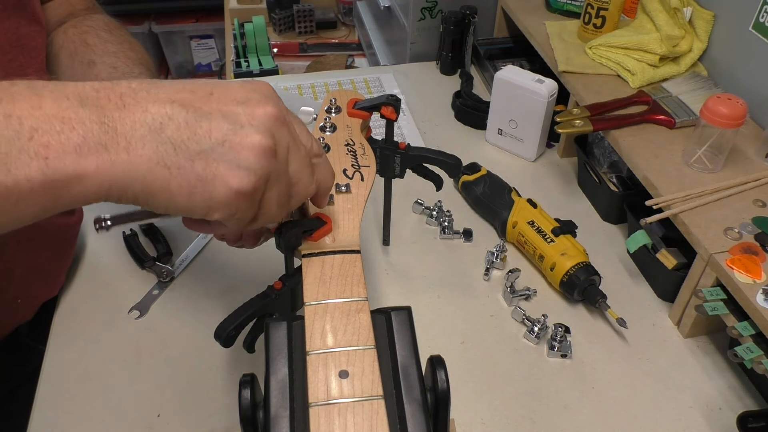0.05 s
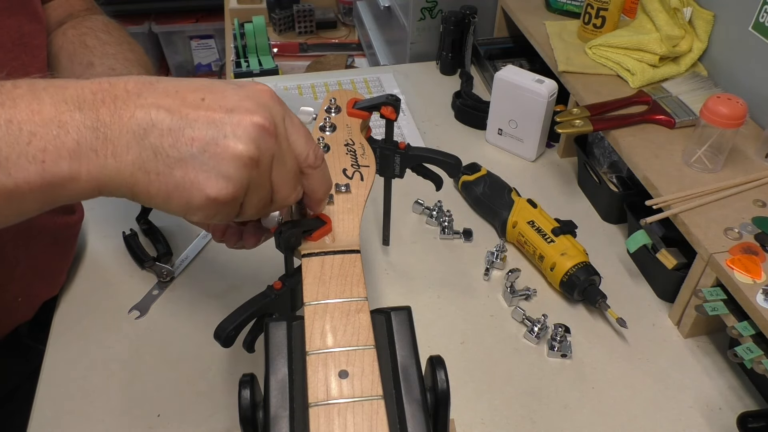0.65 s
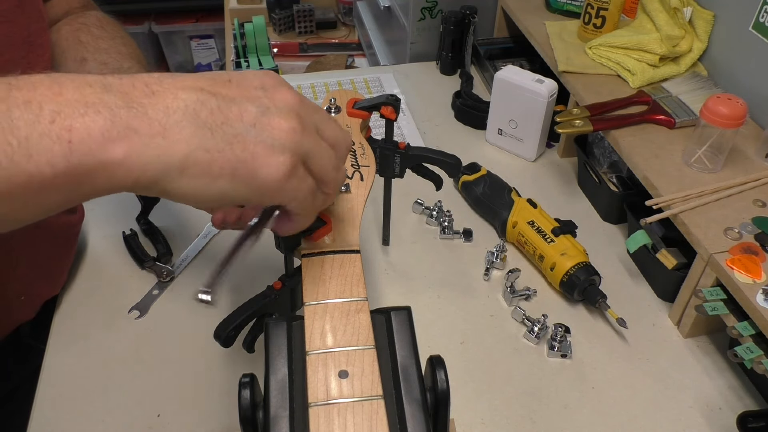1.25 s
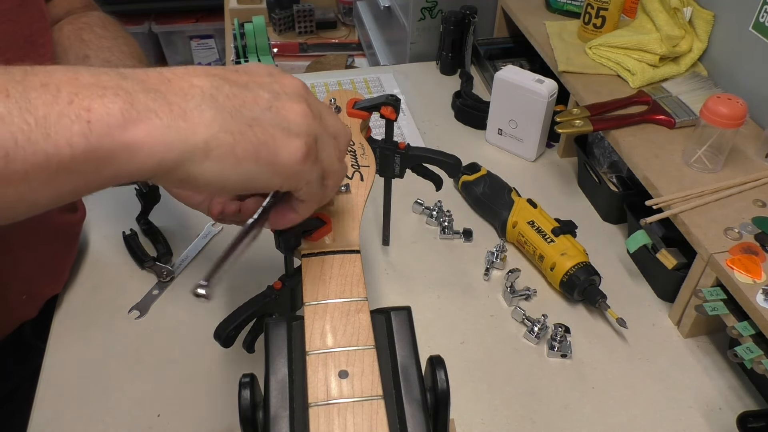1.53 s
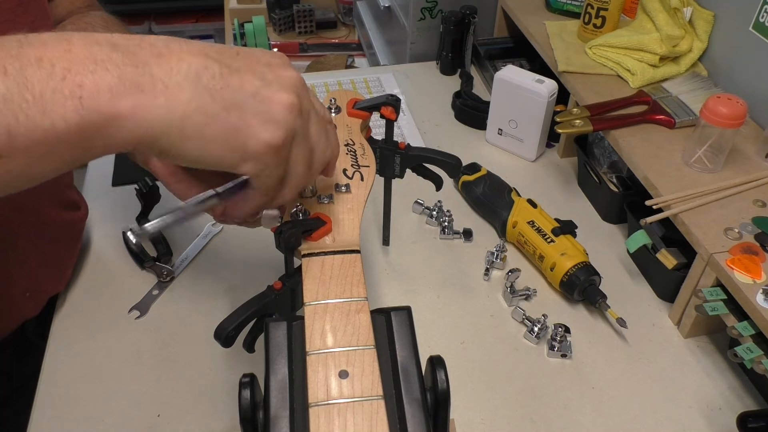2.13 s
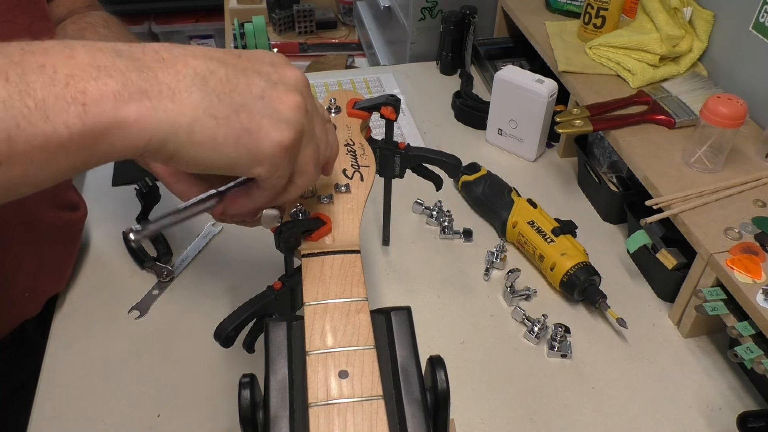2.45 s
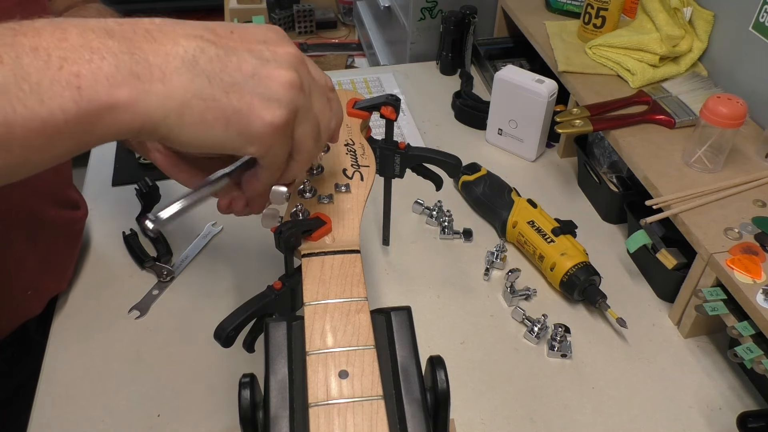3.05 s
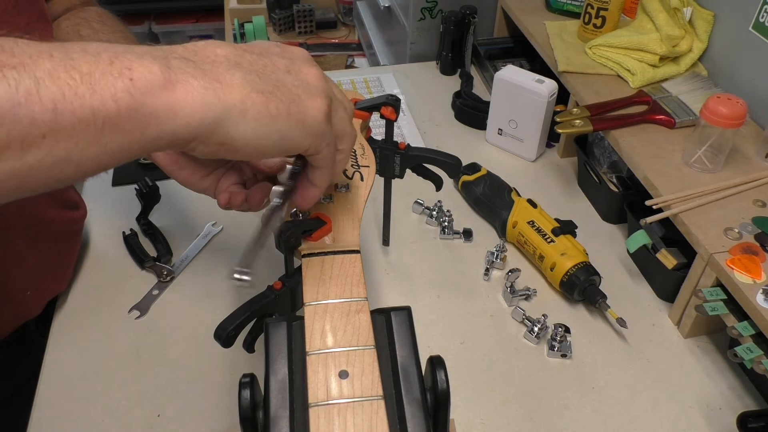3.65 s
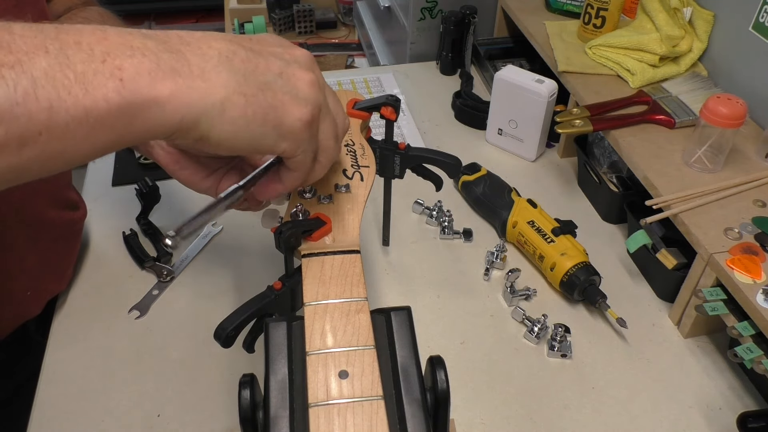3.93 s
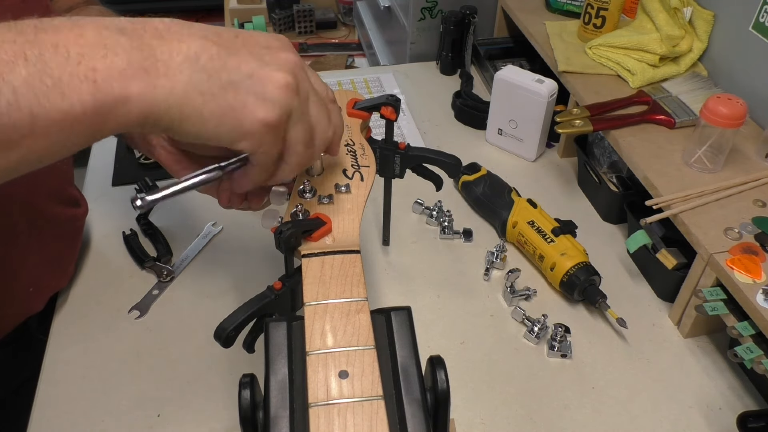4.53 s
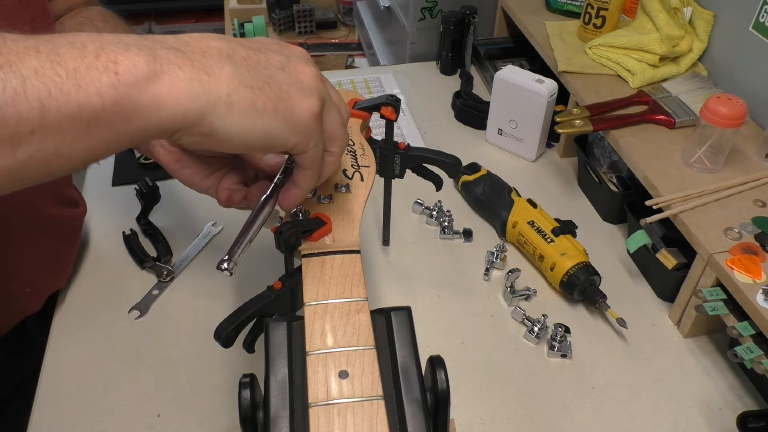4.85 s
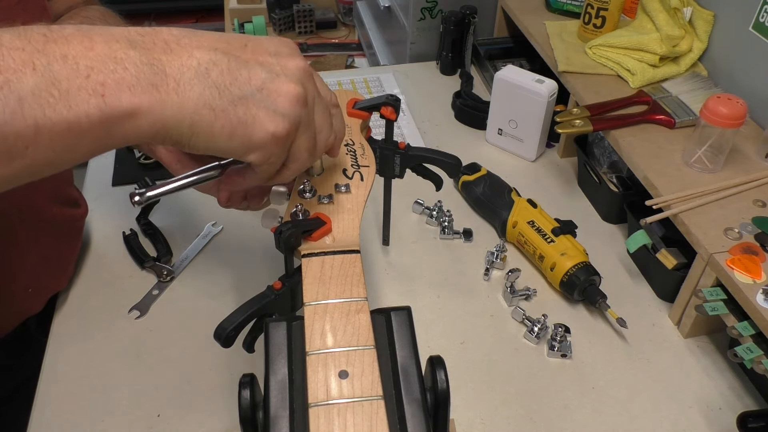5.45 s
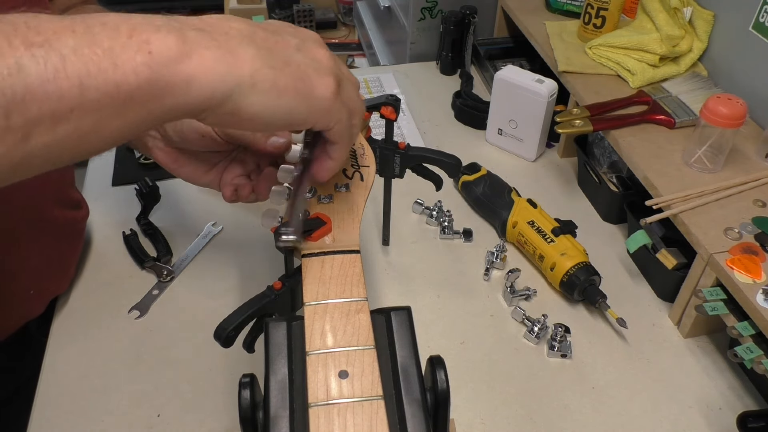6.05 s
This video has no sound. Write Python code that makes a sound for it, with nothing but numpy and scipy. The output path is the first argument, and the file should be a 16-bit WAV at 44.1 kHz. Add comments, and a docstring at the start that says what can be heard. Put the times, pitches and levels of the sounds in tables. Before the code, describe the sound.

A small ratchet wrench tightens nuts on a wooden guitar headstock, with irregular metallic knocks, short scrapes and bright ticks.

```python
"""A small ratchet wrench tightens hex nuts on a wooden guitar headstock clamped to a workbench.
Impacts and stick-slip friction between socket and nut excite the resonant modes of the wood.
The loose socket clacks, steel on steel, and on the back swing the sprung pawl ticks brightly.
The bench top and a small, dry room reflect it all, over faint ventilation, mains hum and hiss."""
import sys
import numpy as np
from scipy import signal
from scipy.fft import rfft, irfft, next_fast_len
from scipy.io import wavfile
from scipy.ndimage import uniform_filter1d

SR = 44100
rng = np.random.default_rng(int(sys.argv[2]) if len(sys.argv) > 2 else 0)


def to_wav(sig):
    """Store sig (one row per channel, or 1-D mono) as 16-bit WAV at the path in sys.argv[1].

    Samples outside -1..1 are clipped; the rate is SR.
    """
    pcm = np.clip(np.atleast_2d(sig), -1, 1) * 32767
    pcm = np.round(pcm).astype(np.int16)
    wavfile.write(sys.argv[1], SR, pcm.T)  # frames by channels


N = 277389
LENGTH = 8192  # samples in an impulse response
HZ = np.fft.rfftfreq(LENGTH, 1 / SR)
AGE = np.arange(LENGTH) / SR


def amp(db):
    """Decibels to amplitude ratio."""
    return 10 ** (np.asarray(db) / 20)


def unit(x):
    """Normalisation to rms 1."""
    return x / np.sqrt(np.mean(x ** 2) + 1e-20)


def fade(t, t60):
    """Exponential decay by 60 dB in t60 seconds."""
    return np.exp(-np.log(1000) * t / t60)


def along(points, hz):
    """Interpolation of (frequency_hz, value) points on a logarithmic frequency axis."""
    f, v = np.transpose(points)
    return np.interp(np.log(hz + 1), np.log(f + 1), v)


def filtered(x, response):
    """Zero-phase filtering: the spectrum of x times a real gain."""
    m = next_fast_len(N + SR // 2)
    return irfft(rfft(x, m) * response(np.fft.rfftfreq(m, 1 / SR)), m)[..., :N]


def add(track, start_s, x):
    """Superposition of x on track from start_s on."""
    part = track[max(round(start_s * SR), 0):][:len(x)]
    part += x[:len(part)]


def body(colour, modes, vary_db=2):
    """Modal response: resonance peaks on a broad spectrum, fed differently at each contact point."""
    offsets_db = vary_db * rng.standard_normal(len(modes))
    peaks = sum(amp(db + offset_db) ** 2 / (1 + (2 * (HZ - hz) / width) ** 2)
                for (hz, width, db), offset_db in zip(modes, offsets_db))
    return amp(along(colour, HZ)) * np.sqrt(1 + peaks)


def ring(force, gain, slow_hz=300):
    """Forced vibration: the force convolved with the minimum-phase response of this gain."""
    cepstrum = irfft(np.log(gain + 1e-6))
    cepstrum[1:LENGTH // 2] *= 2
    cepstrum[LENGTH // 2 + 1:] = 0
    vibration = signal.fftconvolve(force, irfft(np.exp(rfft(cepstrum))))
    # bending waves disperse: an all-pass delays tones below slow_hz
    pole = np.exp(-2 * np.pi * slow_hz / SR)
    poles = np.convolve([1, -pole], [1, -pole])
    return signal.lfilter(poles[::-1], poles, vibration)


def strike(gain, rise_s, t60, linger_db, linger_t60, lumps_db=2.25):
    """Impact excitation: a burst of uneven rebounds, then a weaker rattle, drives a body's modes."""
    envelope = (1 - np.exp(-AGE / rise_s)) * (fade(AGE, t60) + amp(linger_db) * fade(AGE, linger_t60))
    rebounds = amp(lumps_db * unit(uniform_filter1d(rng.standard_normal(LENGTH), size=40)))
    force = envelope * rebounds * rng.standard_normal(LENGTH)
    # every blow, soft or hard, starts with equal energy in each broad band before the body colours it
    power = uniform_filter1d(np.abs(rfft(force)) ** 2, size=401, mode="mirror")
    return ring(force, gain * np.sqrt(SR / 100 / power))


# spectrum of the ventilation: frequency_hz, gain_db
AIR_SPECTRUM = [(15, -47), (25, -44), (50, -1), (85, -8.5), (164, -4.5), (280, -8), (400, -9.5),
                (600, -23.5), (1000, -14.5), (1600, -11), (3000, -18), (6000, -28.5), (15000, -58)]
# spectrum of the microphone hiss: frequency_hz, gain_db
HISS_SPECTRUM = [(1000, -28), (5000, -21), (7000, -12), (10000, -3), (13000, -1), (15500, -4.5)]


def background(air_db=-62.0, hiss_db=-67.0, hum_db=-78, mains_hz=60):
    """Noise floor: broadband ventilation murmur and microphone hiss, plus a pure tone of mains hum."""
    mid, side = filtered(rng.standard_normal((2, N)), lambda hz: amp(along(AIR_SPECTRUM, hz)))
    side = filtered(side, lambda hz: amp(along([(60, -6.5), (250, 1.5), (700, -6), (1500, -2.5)], hz)))
    air = unit(np.array([mid + side, mid - side]))
    hiss = unit(filtered(rng.standard_normal(N), lambda hz: amp(along(HISS_SPECTRUM, hz))))
    hum = unit(np.sin(2 * np.pi * mains_hz * np.arange(N) / SR))
    return amp(air_db) * air + amp(hiss_db) * hiss + amp(hum_db) * hum


# broad spectrum of the clamped headstock: frequency_hz, gain_db
WOOD_SPECTRUM = [(30, -28.5), (100, -25), (200, -19), (350, -17.5), (600, -12), (800, -7), (1100, -4),
                 (2000, -4.5), (4000, -6.5), (6500, -9), (9500, -10), (12000, -14.5), (15500, -21.5)]
# resonances of the wood: pitch_hz, bandwidth_hz, peak_db
WOOD_MODES = [(58, 14, 16), (165, 20, 18), (242, 40, 10), (432, 25, 6), (490, 25, 7), (610, 45, 9),
              (670, 50, 8), (925, 70, 6), (1010, 50, 4), (1138, 42, 7), (1310, 35, 5), (1482, 60, 9),
              (1590, 42, 8), (1708, 34, 8), (1818, 38, 7), (2540, 150, 4), (2935, 65, 9), (3410, 90, 3)]
# a clean steel contact gives less bench boom and headstock thud: edge_db, boom_db, thud_db
WOOD_COUPLING = [(-25, 4, 9), (-8, 6, 2), (-5.5, 3.5, 4), (9, -8.5, -6.5)]


def knock(edge_db, softening=0.14, sparkle=1.1):
    """Contact stiffness shapes a blow: a soft one swells and thuds, a hard one has a treble edge."""
    edges, booms, thuds = np.transpose(WOOD_COUPLING)
    boom_db, thud_db = np.interp(edge_db, edges, booms), np.interp(edge_db, edges, thuds)
    tilt = [(170, boom_db), (500, thud_db), (1100, 0.011), (2200, 0),
            (6000, edge_db), (13000, sparkle * edge_db)]
    wood = body(WOOD_SPECTRUM, WOOD_MODES) * amp(along(tilt, HZ))
    rise_s = 0.00039 * amp(-softening * edge_db)
    return amp(8) * strike(wood, rise_s, t60=0.036, linger_db=-19, linger_t60=0.13)


# blows of the socket on a nut: start_s, relative_level_db, edge_db
KNOCKS = [(0.022, -53.5, -1.5), (0.1976, -53.5, 2), (0.694, -47, -21), (0.7114, -40.5, -22),
          (0.7258, -42.5, 0), (1.1647, -29, 5.5), (1.1903, -29.5, 2), (1.204, -32, -6.5),
          (1.2976, -33.5, -9.5), (1.3327, -26.5, -3.5), (1.545, -45.5, -12), (1.556, -44.5, -4),
          (1.631, -55.5, -28), (2.084, -44.5, -21), (2.107, -34, -14.5), (2.1508, -29.5, -4),
          (2.4163, -41.5, -20.5), (2.459, -41.5, -4.5), (2.5317, -39.5, 0.5), (2.569, -34.5, -3),
          (2.5995, -28, -7), (2.6584, -29, -11), (2.7163, -36, -14.5), (2.8251, -40, -11),
          (2.946, -44, 3.5), (3.155, -57.5, 11.5), (3.1766, -33.5, 6), (3.255, -30, 1.5), (3.2656, -24, 6),
          (3.3372, -25.5, 2), (3.4604, -29.5, -17.5), (3.533, -45.5, -10), (3.6682, -36.5, -36),
          (3.769, -46.5, -2), (4.2616, -43.5, 7.5), (4.534, -42, -12), (4.575, -35.5, -4),
          (4.9812, -35.5, -12), (5.0217, -39, -15), (5.0892, -43.5, -40), (5.5124, -37, -6.5),
          (5.8796, -28.5, -3), (5.9063, -32, -18), (6.1722, -30, -7), (6.2698, -54, 2.5)]


def knocks():
    """Structure-borne sound: blows, bounces, fidgets and catches pass through the nut into the wood."""
    out = np.zeros(N)
    for start_s, level_db, edge_db in list(KNOCKS) + bounces() + fidgets() + catches():
        add(out, start_s, amp(level_db) * knock(edge_db))
    return out


def fidgets(count=10, level_db=-63, edge_db=-1.5):
    """Mechanical play: the loose socket ticks at random as the hand shifts. Rows as in KNOCKS."""
    return [(start_s, level_db, edge_db) for start_s in rng.random(size=count) * N / SR]


# drags of the socket over a nut: start_s, end_s, relative_level_db
SCRAPES = [(0.691, 0.777, -54.5), (1.175, 1.211, -42), (1.42, 1.51, -61.5), (2.078, 2.167, -53),
           (2.432, 2.574, -49.5), (2.571, 2.74, -54), (2.824, 2.91, -61), (3.429, 3.458, -53),
           (3.65, 3.722, -58.5), (4.49, 4.653, -57), (4.975, 5.06, -48.5), (5.444, 5.51, -68.5),
           (5.803, 5.877, -53.5), (5.876, 5.929, -45), (6.264, 6.32, -47)]


def scrapes(slips_per_s=200, spread_db=7, rub=0.093):
    """Stick-slip friction: brief rasps of uneven size over a fine rub, dulled by the wood."""
    out = np.zeros(N)
    dull = amp(along([(200, 5.0), (600, 4.0), (1500, 0.5), (6000, -9)], HZ))
    for start_s, end_s, level_db in SCRAPES:
        n = max(round((end_s - start_s) * SR), LENGTH // 16)
        slipping = rng.random(N) < slips_per_s / SR
        slips = slipping * amp(spread_db * (2 * rng.random(N) - 3.0))
        rasp = signal.fftconvolve(slips[:n], fade(AGE, t60=0.032))[:n]
        force = unit((rasp + rub) * rng.standard_normal(N)[:n]) * signal.windows.tukey(n, .5)
        wood = body(WOOD_SPECTRUM, WOOD_MODES) * dull
        add(out, start_s, amp(level_db + 9.0) * ring(force, wood))
    return out


def catches(gap_s=0.027, jitter=0.35, over_drag_db=7.5, spread_db=2, edge_db=-13.5, edge_spread_db=4):
    """Static friction: the dragged socket grips and lets go at an uneven pace. Rows as in KNOCKS."""
    rows = []
    for start_s, end_s, drag_db in SCRAPES:
        for k, (late, force, edge) in enumerate(rng.standard_normal(size=(16, 3))):
            catch_s = start_s + gap_s * (k + jitter * abs(late))
            level_db = drag_db + over_drag_db + spread_db * force
            if catch_s < end_s:
                rows.append((catch_s, level_db, edge_db + edge_spread_db * edge))
    return rows


# broad spectrum of the steel socket: frequency_hz, gain_db
SOCKET_SPECTRUM = [(60, -16.5), (600, -11), (1500, -2.5), (3000, -4), (6500, -3), (9500, -2.5),
                   (12000, -6.5), (14000, -6), (15500, -19)]
# resonances of the socket: pitch_hz, bandwidth_hz, peak_db
SOCKET_MODES = [(1715, 35, 8), (2780, 120, 9), (3110, 120, 10), (3420, 110, 10), (3890, 110, 10),
                (4370, 110, 7), (4740, 80, 5), (5890, 110, 6), (7520, 130, 6), (8650, 160, 5),
                (9150, 170, 5), (10400, 500, 6)]
# hits of steel on steel: start_s, relative_level_db, edge_db
CLACKS = [(0.759, -28.5, -3), (0.765, -21.5, -3), (0.7685, -24, -5.5), (5.561, -23, 1), (5.579, -24, 2.5),
          (5.603, -31.5, -12)]


def clacks():
    """Hard impact: the socket jumps on or off a nut and rattles on its drive, ringing its own modes."""
    out = np.zeros(N)
    for start_s, level_db, edge_db in CLACKS:
        steel = body(SOCKET_SPECTRUM, SOCKET_MODES) * amp(along([(4000, 0), (11000, edge_db)], HZ))
        clack = strike(steel, rise_s=0.00022, t60=0.028, linger_db=-14, linger_t60=0.093)
        add(out, start_s, amp(level_db) * clack)
    return out


def bounces(flight_s=0.018, loss_db=11, threshold_db=3):
    """Inelastic rebound: after a hard blow the socket lands again, more lightly. Rows as in KNOCKS."""
    return [(start_s + flight_s, level_db - loss_db, edge_db)
            for start_s, level_db, edge_db in KNOCKS if edge_db > threshold_db]


# broad spectrum of the ratchet head: frequency_hz, gain_db
RATCHET_SPECTRUM = [(60, -24.5), (500, -27.5), (1000, -17.5), (2000, -12.5), (3000, -18.5), (4200, -16.5),
                    (6500, -15), (8500, -14.5), (11000, -11), (13200, -11), (15400, -6.5), (16000, -16)]
# resonances of the head: pitch_hz, bandwidth_hz, peak_db
RATCHET_MODES = [(2960, 120, 11), (5510, 80, 8), (8300, 400, 6), (12700, 180, 4), (13700, 220, 13),
                 (14000, 190, 16), (14300, 180, 12), (14880, 140, 4)]
# the pawl's own resonance: pitch_hz, bandwidth_hz, peak_db
PAWL_MODE = (9945, 270, 13.2)
# drops of the pawl over a tooth: start_s, relative_level_db, ring_db
PAWL_SNAPS = [(2.2003, -23, -7), (2.2292, -20.5, -3.5), (2.2537, -23.5, -2), (2.288, -22.5, -10.5),
              (3.477, -26.5, 7), (4.642, -19.5, -3), (4.67, -17.5, -13.5), (4.702, -22, 4.5),
              (4.783, -20, 6.5), (4.851, -23.5, 5)]


def pawl(usual_db=-22.5):
    """Spring release: the pawl snaps onto a tooth and rings the head; harder snaps are brighter."""
    out = np.zeros(N)
    pitch_hz, bandwidth_hz, peak_db = PAWL_MODE
    for start_s, level_db, ring_db in PAWL_SNAPS:
        modes = RATCHET_MODES + [(pitch_hz, bandwidth_hz, peak_db + ring_db)]
        tilt = amp(along([(5000, usual_db - level_db), (12000, 0)], HZ))
        head = body(RATCHET_SPECTRUM, modes, vary_db=2.35) * tilt
        snap = strike(head, rise_s=0.00061, t60=0.031, linger_db=-12, linger_t60=0.11)
        add(out, start_s, amp(level_db + 7.0) * snap)
    return out


# reverberation time of the room: frequency_hz, t60_s
REVERB_TIMES = [(100, 0.38), (700, 0.32), (2000, 0.29), (5000, 0.28), (13000, 0.16)]


def diffuse(x, build_s=0.0011):
    """Diffuse field: two uncorrelated reverberant tails of x, changing as the hands move about."""
    out, step = np.zeros((2, N)), SR // 3
    for i in range(0, N, step):
        hz, t, noise = signal.stft(rng.standard_normal((2, SR // 2)), SR, nperseg=256)
        envelope = fade(t, along(REVERB_TIMES, hz)[:, None]) * (1 - np.exp(-t / build_s))
        tail = signal.istft(noise * envelope, SR, nperseg=256)[1]
        reverbs = signal.fftconvolve(x[None, i:i + step], tail / np.linalg.norm(tail[0]), axes=1)
        for track, reverb in zip(out, reverbs):
            add(track, i / SR, reverb)
    return out


# reverberant tail against direct sound: frequency_hz, gain_db
TAIL_SPECTRUM = [(60, -2.5), (170, -1.5), (450, -5), (1200, -6.5), (3000, -10.5), (13000, -12)]
# spread between left and right: frequency_hz, side_gain_db
STEREO_WIDTH = [(200, 2.5), (600, -4.5), (2500, 3), (6000, 1.5), (10000, -7.5), (14000, -10.5)]


def room(x, wide_db=-8, wall_s=0.0089, wall_db=-17, near_side_db=-17):
    """Reflection: direct sound, one wall echo and a short, wide tail that is strongest in the bass."""
    tail_mid, tail_side = filtered(diffuse(x), lambda hz: amp(along(TAIL_SPECTRUM, hz)))
    wall = np.pad(x, (round(wall_s * SR), 0))[:N]
    # things on the bench scatter the first milliseconds differently to left and right
    scatter = rng.standard_normal(LENGTH) * fade(AGE, t60=0.0057)
    near = signal.fftconvolve(x, scatter / np.linalg.norm(scatter))[:N]
    mid = x + amp(wall_db) * wall + tail_mid
    side = amp(near_side_db) * near + amp(wide_db) * tail_side
    side = filtered(side, lambda hz: amp(along(STEREO_WIDTH, hz)))
    return np.array([mid + side, mid - side])


def scene():
    """Superposition: the wrench in the room, almost straight ahead, over the noise floor."""
    balance = amp([[-.2], [.2]])
    return background() + room(pawl() + clacks() + scrapes() + knocks()) * balance


def record(dry, cutoff_hz=15850):
    """Band limiting: a steep low-pass removes the highest treble."""
    return filtered(dry, lambda hz: 1 / np.sqrt(1 + (hz / cutoff_hz) ** 240))


dry = scene()
out = record(dry)
to_wav(out)
```